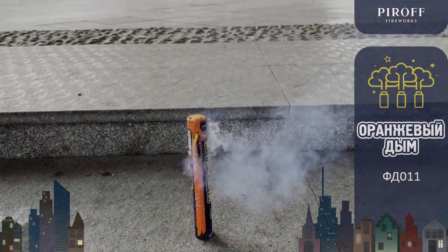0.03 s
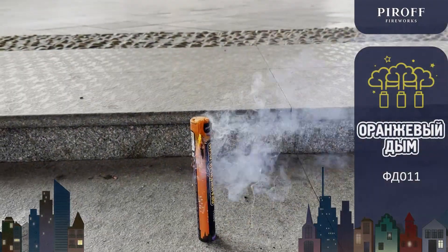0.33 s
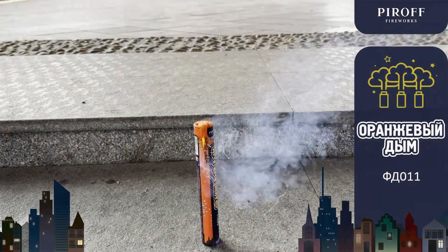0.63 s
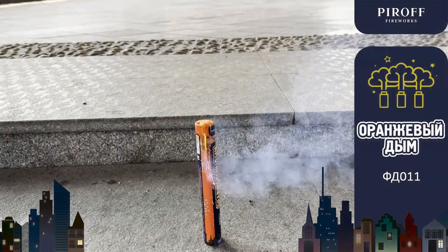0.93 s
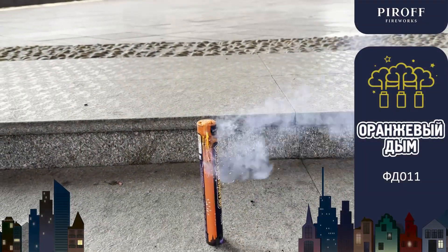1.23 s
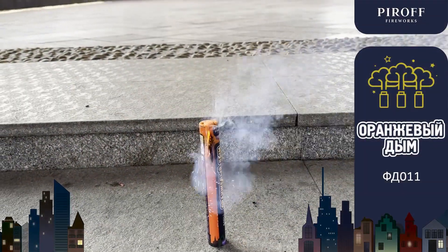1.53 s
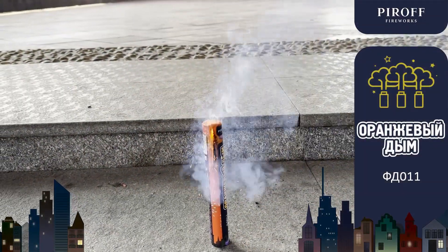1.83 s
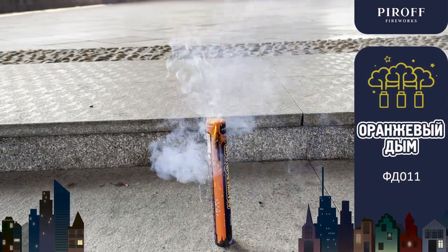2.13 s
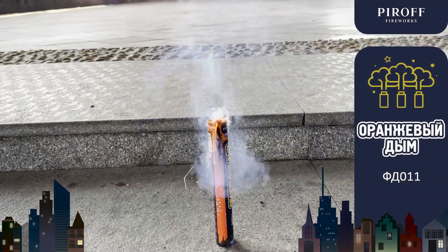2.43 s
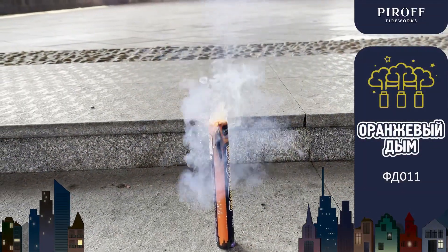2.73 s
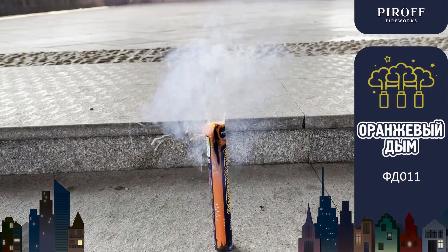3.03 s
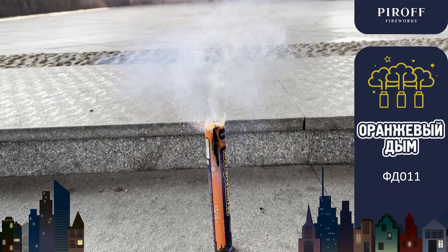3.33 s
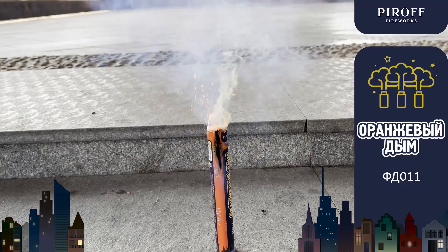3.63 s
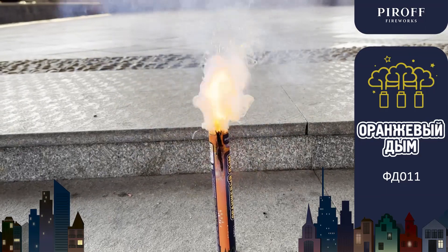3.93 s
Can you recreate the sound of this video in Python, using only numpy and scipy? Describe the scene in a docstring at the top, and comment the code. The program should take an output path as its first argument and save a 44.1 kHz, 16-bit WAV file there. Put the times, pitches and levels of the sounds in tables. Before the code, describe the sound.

A burning smoke tube hisses close by throughout, high and steady, with a breathy rush and faint sputtering. Small handling taps knock the microphone between 0.2 and 0.8 seconds, loudest near 0.4. The nozzle spits lightly around 1.5 and 3.1 seconds. From about 2.7 seconds the hiss turns softer and duller, swelling briefly near 3.8. Low wind rumble and distant traffic run underneath.

```python
"""Smoke tube on a pavement

A smoke tube burns close to a hand-held camera with two microphone ports, left and right.
Its nozzle gives a high hiss that sags and dulls late on as the pressure drops, over a breathier
rush of smoke and a sputter of burning grains. Wind rumbles and far traffic drones below.
A few small taps knock the camera body and make it ring."""
import sys
import numpy as np
from scipy import signal
from scipy.fft import rfft, irfft
from scipy.io import wavfile
from scipy.ndimage import uniform_filter1d

SR = 44100
rng = np.random.default_rng(int(sys.argv[2]) if len(sys.argv) > 2 else 0)


def to_wav(s):
    """Save 16-bit WAV."""
    ch = np.atleast_2d(s).T  # columns
    pcm = np.round(np.clip(ch, -1, 1) * 32767)  # PCM
    wavfile.write(sys.argv[1], SR, pcm.astype(np.int16))


N = 176400  # 4 seconds


def amp(db):
    """Turns decibels into a number to multiply a sound by."""
    return 10 ** (np.asarray(db) / 20)


def evened(x):
    """Scales a signal so that its average strength (rms) is 1."""
    return x / np.sqrt(np.mean(x ** 2) + 1e-20)


def at_hz(points, hz):
    """Looks up a table by frequency, gliding between its rows octave by octave."""
    freqs, values = np.transpose(points)
    return np.interp(np.log(hz + 1), np.log(freqs + 1), values)


def at_time(rows, t, column=1):
    """Looks up a table by time, gliding between its rows."""
    rows = np.array(rows)
    return np.interp(t, rows[:, 0], rows[:, column])


def add(mix, start_s, sound):
    """Mixes a sound in at its start time."""
    part = mix[max(round(start_s * SR), 0):][:len(sound)]
    part += sound[:len(part)]


def wander(t, top_hz):
    """A random wobble made of 20 slow waves."""
    rates = np.geomspace(top_hz / 10, top_hz, 20)
    return evened(sum(np.sin(2 * np.pi * (f * t + rng.random())) / np.sqrt(f) for f in rates))


# How alike the two ports sound: freq_hz, likeness_0_to_1
PORT_LIKENESS = [(70, .99), (140, .96), (300, .8), (650, .5), (1000, .66), (1300, .5), (1800, .86),
                 (3500, .78), (4700, .73), (5800, .45), (7000, .6), (8500, .82), (10500, .93), (12000, .98),
                 (13500, .82), (15500, .58)]
# How far the left port's wave runs ahead: freq_hz, lead_radians
LEFT_LEAD = [(50, 0), (500, 0), (1300, -.3), (2000, .05), (3400, 1.3), (4700, .75), (5400, 2.2),
             (6300, 1.2), (7900, 2.5), (9500, 1.2), (11300, .1), (12900, -.05), (13600, -.75), (15700, -2)]
# How much louder the left port is: freq_hz, left_minus_right_db
LEFT_LOUDER = [(60, 0.58), (110, 0.64), (200, 0.84), (380, 1.5), (700, 1.3), (1290, 0.37), (2380, 0.14),
               (4400, 1.2), (8120, 1.6), (15000, 0.0)]

def noise(colour, patchy_db, flicker_db, size, shade=None):
    """Swirling air at both ports, built in frames of `size` samples; `shade` is a moving filter."""
    hop = size // 4
    t = np.arange(N // hop + 5) * hop / SR
    hz = np.fft.rfftfreq(size, 1 / SR)
    draws = rng.standard_normal((5, len(t), len(hz))).transpose(0, 2, 1)
    left, unrelated = draws[0] + 1j * draws[1], draws[2] + 1j * draws[3]
    likeness = np.clip(at_hz(PORT_LIKENESS, hz), 0, .99)[:, None]
    right = likeness * left + np.sqrt(1 - likeness ** 2) * unrelated
    right *= np.exp(-1j * at_hz(LEFT_LEAD, hz))[:, None]
    lean = amp(at_hz(LEFT_LOUDER, hz) / 2)[:, None]
    spectrum = np.array([left * lean, right / lean])
    # Patches lift or dip nearby frequencies; flicker moves them all together.
    patches = evened(uniform_filter1d(uniform_filter1d(draws[4], size=12, axis=0), size=12, axis=1))
    flicker = wander(t, top_hz=23.89)
    spectrum *= amp(at_hz(colour, hz)[:, None] + patchy_db * patches + flicker_db * flicker)
    plain = signal.istft(spectrum, nperseg=size, noverlap=size - hop)[1][:, :N]
    if shade is None:
        return evened(plain)
    shaded = signal.istft(spectrum * shade(t, hz), nperseg=size, noverlap=size - hop)[1][:, :N]
    return shaded / plain.std()


# Tone of the street's low wash: freq_hz, level_db
STREET_TONE = [(88, -48), (150, -2.5), (242, -1.5), (270, -5.5), (408, -10.5), (627, -11.5), (982, -10.5),
               (1140, -12), (1260, -20.5), (1400, -15), (1820, -64), (3080, -120)]

def street(t):
    """A low wash of far traffic that swells a little with the rush of smoke."""
    rush_db = at_time(RUSH_LEVELS, t)
    level_db = -45 + .37 * (rush_db - rush_db.mean())
    return amp(level_db) * noise(STREET_TONE, patchy_db=1.53, flicker_db=.5, size=2048)


# Notes of far engines: start_s, end_s, pitch_hz, level_db
ENGINE_NOTES = [(-.1, .35, 92.3, -25), (-.1, .365, 61.1, -32.5), (-.1, 1.25, 235, -55),
                (1.3, 1.92, 243, -46.5), (2.4, 2.69, 54, -33), (2.71, 2.82, 54, -24),
                (2.91, 3.03, 54, -23.5), (2.9, 3.05, 109, -35), (3.06, 3.35, 52.4, -32),
                (3.2, 3.85, 231, -51), (3.46, 4.1, 53, -36)]

def engines(t):
    """Far engines fade in and out, each humming one wavering note."""
    fade_s, pitch_waver, flutter_db = .14, .0064, .8
    out = np.zeros(N)
    for start_s, end_s, pitch_hz, level_db in ENGINE_NOTES:
        fade = np.clip(np.minimum(t - start_s, end_s - t) / fade_s + .5, 0, 1)
        cycles = np.cumsum(pitch_hz * (1 + pitch_waver * wander(t, top_hz=6))) / SR
        out += fade * amp(level_db + flutter_db * wander(t, top_hz=9)) * np.sin(2 * np.pi * cycles)
    return out


# Strength of the wind: time_s, level_db
WIND_LEVELS = [(0, -35.5), (.4, -33.5), (.68, -35.5), (1.2, -33.5), (1.45, -38), (1.9, -36), (2.5, -32.5),
               (2.87, -41.5), (3.2, -34.5), (4, -34)]
# Short gusts on the ports: peak_s, width_s, rise_db
WIND_GUSTS = [(0.982, 0.09, 0.5), (1.15, 0.016, 3), (2.05, .03, 3.5), (2.212, 0.025, 4.5), (2.75, 0.033, 5),
              (2.95, 0.017, 7.5)]
# Tone of the rumble: freq_hz, level_db
WIND_TONE = [(20, -43), (36, -35), (48, -5), (60, 3), (78, -5), (100, -4.5), (122, -8), (155, -20.5),
             (220, -29), (400, -49.5)]

def wind(t):
    """Wind blows on the ports and makes a lumpy rumble with short gusts."""
    gust_db = sum(db * np.exp(-.5 * ((t - peak_s) / width_s) ** 2) for peak_s, width_s, db in WIND_GUSTS)
    rumble = noise(WIND_TONE, patchy_db=1.1, flicker_db=0, size=4096)
    return amp(at_time(WIND_LEVELS, t) + gust_db) * rumble


def ring(notes, level_db, rise_s, alternate=False):
    """One blow starts notes that each fade 60 dB in fade_s; `alternate` flips every second wave."""
    t = np.arange(SR // 5) / SR
    sign = -1 if alternate else 1
    out = np.zeros(len(t))
    for k, (pitch_hz, offset_db, fade_s) in enumerate(notes):
        fade = np.exp(-np.log(1000) * t / fade_s)
        out += sign ** k * amp(level_db + offset_db) * fade * np.sin(2 * np.pi * pitch_hz * t)
    return (1 - np.exp(-(t / rise_s) ** 2)) * out


# Four ways the camera body rings, from low to high: pitch_hz, offset_db, fade_s
KNOCK_NOTES = [(270, -6, .028), (390, -7, .018), (810, -1, .013)]
HOLLOW_NOTES = [(585, 0, .016), (1150, -11, .011), (1580, -8, .007), (1950, -9.5, .007)]
TICK_NOTES = [(2014, -5, 0.006), (2520, -2, 0.0063), (2970, -13, 0.0032)]
SNAP_NOTES = [(3740, -3.5, 0.0049), (4820, 0, 0.0027), (5260, -14.5, 0.017), (7230, -6, 0.005)]
# Taps on the body: start_s, knock_db, hollow_db, tick_db, snap_db, thump_db, thump_hz
BODY_TAPS = [(.183, -27, -32, -43, -50, -30, 95), (.261, -36, -39, -48, -55, -36, 110),
             (.279, -35, -42, -48, -55, -36, 110), (.3947, -31, -18, -24, -24.5, -30, 150),
             (.4042, -18, -24, -20.5, -23.5, -3.5, 64), (.4628, -23.5, -40, -24, -35, -12.5, 125),
             (.4998, -33, -30, -44, -55, -27, 133), (.5268, -24, -33, -24, -42, -7.5, 92),
             (.7596, -27, -35, -22.5, -39, -14, 83)]

def taps():
    """Each tap snaps and knocks, more or less hollow by where it lands; then the whole body thumps."""
    knock_lag_s, thump_lag_s = .0008, .007
    out = np.zeros(N)
    for start_s, knock_db, hollow_db, tick_db, snap_db, thump_db, thump_hz in BODY_TAPS:
        tick = ring(TICK_NOTES, tick_db, rise_s=.00032)
        snap = ring(SNAP_NOTES, snap_db, rise_s=.00013)
        knock = ring(KNOCK_NOTES, knock_db, rise_s=.00067, alternate=True)
        hollow = ring(HOLLOW_NOTES, hollow_db, rise_s=.0004)
        thump = ring([(thump_hz, 0, 6 / thump_hz)], thump_db, rise_s=.9 / thump_hz)  # fades in 6 swings
        add(out, start_s, tick + snap)
        add(out, start_s + knock_lag_s, knock + hollow)
        add(out, start_s + thump_lag_s, thump)
    # The taps are louder on the left, most of all in the treble.
    lean = amp(at_hz([(120, .58), (500, 2.5), (4000, 9.7)], np.fft.rfftfreq(N, 1 / SR)))
    return irfft(rfft(out) * np.array([lean, 1 / lean]), N)


# Spits from the nozzle: peak_s, width_s, level_db
NOZZLE_SPITS = [(.93, .03, -50), (1.525, .016, -44.5), (1.58, .025, -46), (3.127, .0014, -39),
                (3.15, .02, -47), (3.1685, .003, -42.5), (3.428, .004, -45)]
# Tone of the pops and spits: freq_hz, level_db
SPUTTER_TONE = [(400, -19), (950, -4.5), (1700, -8), (2700, -2.5), (4200, -10), (6200, -9), (10000, -22),
                (15000, -38)]

def sputter(t):
    """Burning grains make tiny pops that follow the level of the rush; the nozzle also spits."""
    pops_per_s, below_rush_db = 130, 14
    clicks = (rng.random(N) < pops_per_s / SR) * rng.standard_normal(N)
    clicks *= amp(-3.5 * np.minimum(rng.exponential(1, N), 2))  # each is up to 7 dB softer
    tone = amp(at_hz(SPUTTER_TONE, np.fft.rfftfreq(N, 1 / SR)))
    pops = evened(irfft(rfft(clicks) * tone, N)) * amp(at_time(RUSH_LEVELS, t) - below_rush_db)
    spit_gain = sum(amp(db) * np.exp(-.5 * ((t - peak_s) / width_s) ** 2)
                    for peak_s, width_s, db in NOZZLE_SPITS)
    return pops + spit_gain * noise(SPUTTER_TONE, patchy_db=-4, flicker_db=4, size=512)


# How late the pavement echo comes as the camera shifts: time_s, delay_ms
PAVEMENT_DELAY = [(0, 1.128), (1.6, 1.132), (2.5, 1.146), (2.8, 1.17), (3.05, 1.192), (4, 1.197)]

def echoes(t, hz):
    """Echoes off the pavement and a rough step behind the tube lift some frequencies and dip others."""
    step_delay_ms, step_top_hz = 2.032, 10000
    turn_per_ms = -2j * np.pi * hz[:, None] / 1000
    pavement = .27 * np.exp(turn_per_ms * at_time(PAVEMENT_DELAY, t))
    step_gain = .13 / np.sqrt(1 + (hz[:, None] / step_top_hz) ** 8)
    return 1 + pavement + step_gain * np.exp(turn_per_ms * step_delay_ms)


# Rise and fall of the rush: time_s, relative_level_db
RUSH_LEVELS = [(0, -48.7), (.8, -48.7), (.93, -47.2), (1.05, -49.5), (1.48, -49.8), (1.52, -47.5),
               (1.65, -48.5), (1.9, -47.7), (2.05, -50), (2.17, -48.3), (2.35, -50.5), (2.53, -47.7),
               (2.8, -52), (2.98, -52), (3.15, -49.8), (3.3, -50), (3.44, -47.7), (3.6, -49), (3.77, -45),
               (3.87, -50), (4, -48)]
# Tone of the rush: freq_hz, level_db
RUSH_TONE = [(650, -24), (1100, 0.5), (1300, -10), (1520, 0), (1900, -5), (2200, -6.5), (2450, -4),
             (2750, -5), (3150, -1), (3550, -2), (4000, -4.5), (4700, -4), (5200, -9), (6200, -7),
             (7400, -11), (8500, -8), (11000, -28), (16000, -80)]

def smoke_rush(t):
    """Escaping smoke swirls and makes a breathy rush."""
    breath = noise(RUSH_TONE, patchy_db=1.18, flicker_db=1, size=1024, shade=echoes)
    return amp(at_time(RUSH_LEVELS, t) + 3) * breath


# How the hiss sags and dulls: time_s, relative_level_db, relative_treble_db
HISS_LEVELS = [(0, -44, 0), (.76, -44.4, .5), (.88, -43.2, -.5), (1.3, -44.1, -1), (2.1, -44, -.8),
               (2.4, -44.8, -1.4), (2.62, -45, -1.6), (2.8, -49.5, -3.5), (2.92, -50.7, -4.5),
               (2.99, -47.8, -2.3), (3.6, -49, -3.3), (3.76, -46, -4), (3.84, -49.5, -3), (4, -53.5, -3)]
# Tone of the hiss: freq_hz, level_db
HISS_TONE = [(4500, -41), (7000, -11), (8300, -5.5), (9400, -2), (10500, 1), (12000, -4), (13000, -3.5),
             (14200, -4), (14900, -5.5), (15700, -8)]

def nozzle_hiss(t):
    """The nozzle hisses high, growing softer and duller as its pressure drops."""
    def shade(t, hz):
        """Turns the top treble up or down and adds the echoes."""
        treble_share = at_hz([(10500, 0), (13000, 1)], hz)[:, None]
        treble_db = at_time(HISS_LEVELS, t, column=2) + 1
        return echoes(t, hz) * amp(treble_share * treble_db)
    hiss = noise(HISS_TONE, patchy_db=1.1, flicker_db=.5, size=1024, shade=shade)
    return amp(at_time(HISS_LEVELS, t) + 4.5) * hiss


def scene():
    """Adds up all the sounds at the two ports."""
    t = np.arange(N) / SR
    smoke_tube = nozzle_hiss(t) + smoke_rush(t) + sputter(t)
    return smoke_tube + wind(t) + street(t) + engines(t) + taps()


def record(dry):
    """The camera cuts away the deepest rumble and the highest treble."""
    low_cut_hz, high_cut_hz = 35, 15740
    hz = np.fft.rfftfreq(N, 1 / SR)
    trimmed = irfft(rfft(dry) / np.sqrt(1 + (low_cut_hz / (hz + 1)) ** 6), N)
    treble_filter = signal.firwin(801, high_cut_hz, window=("kaiser", 9), fs=SR)
    return signal.oaconvolve(trimmed, treble_filter[None], "same")


dry = scene()
out = record(dry)
to_wav(out)
```